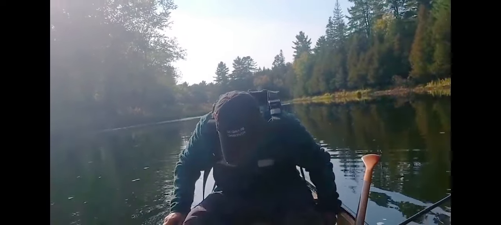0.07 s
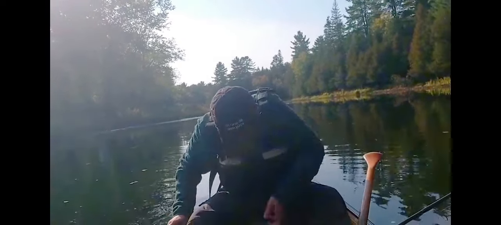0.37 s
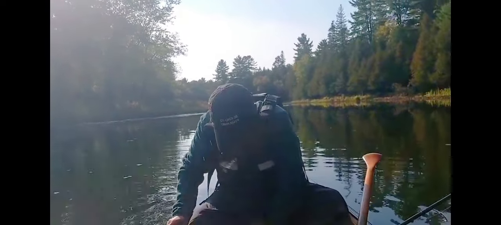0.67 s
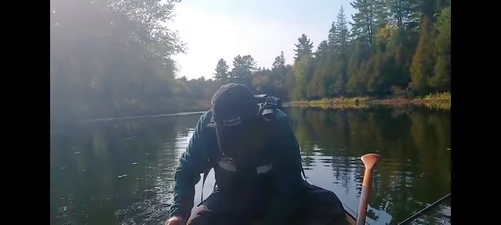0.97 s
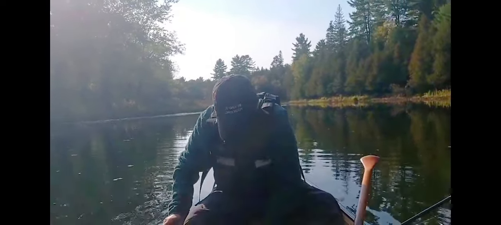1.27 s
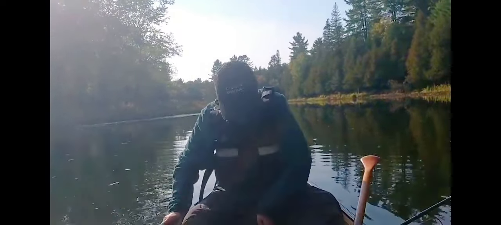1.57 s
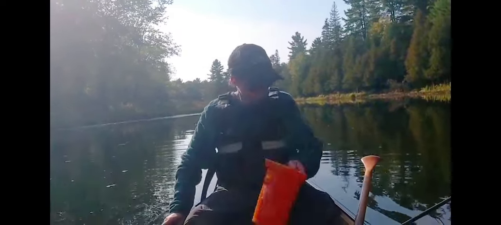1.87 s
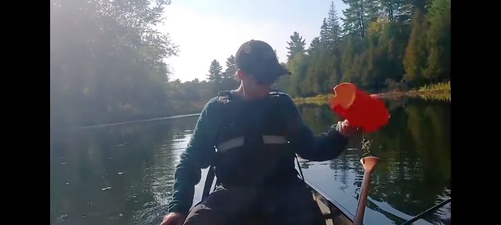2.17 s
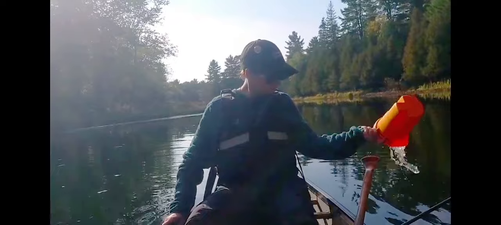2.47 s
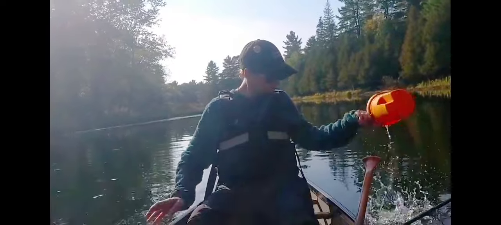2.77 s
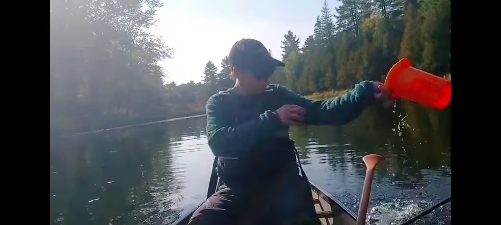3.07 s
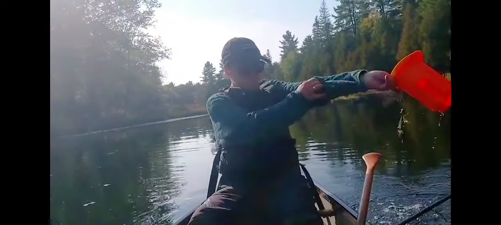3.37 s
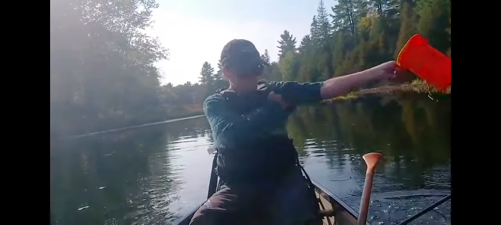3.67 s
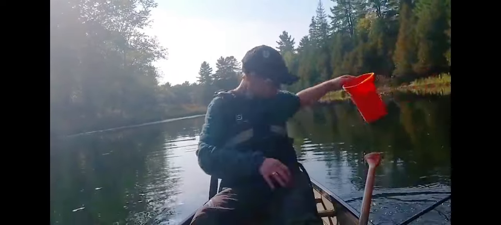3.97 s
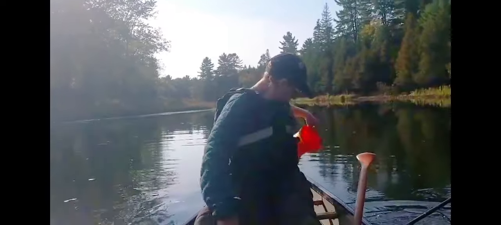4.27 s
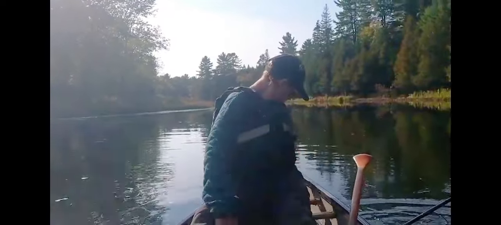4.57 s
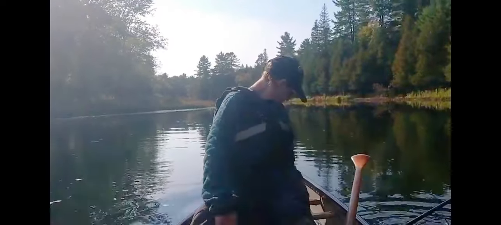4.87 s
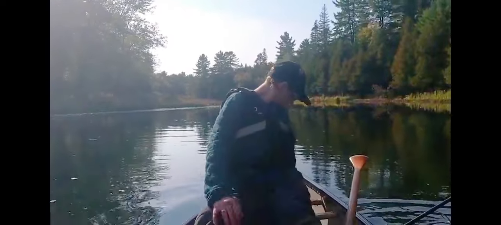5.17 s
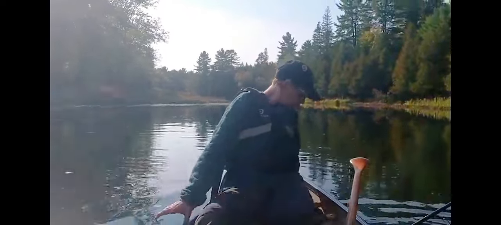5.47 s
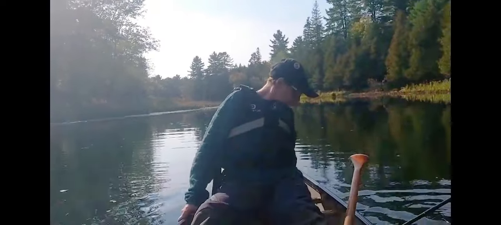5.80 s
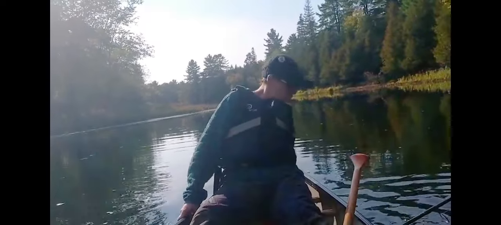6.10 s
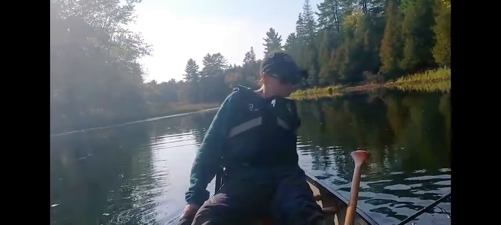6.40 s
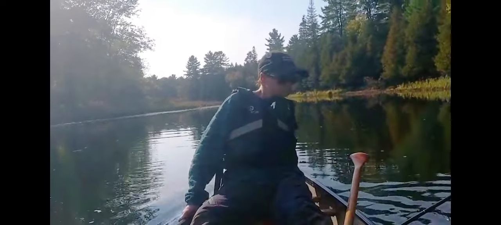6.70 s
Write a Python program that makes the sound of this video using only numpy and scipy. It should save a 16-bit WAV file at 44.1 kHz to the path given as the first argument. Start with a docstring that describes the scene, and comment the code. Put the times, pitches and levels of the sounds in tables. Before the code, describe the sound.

Close by on a calm creek, a plastic jug scrapes along the bottom of a canoe, bumping the hollow hull, and gulps up some water. It is emptied over the side in one short, bright splash that trails off in dribbles. A jacket sleeve rustles and the jug is set down with a click. Then the hull knocks, booms and scrapes again as weight shifts, over a faint outdoor hush.

```python
"""Bailing a canoe

On a calm creek, close by, a plastic jug scrapes along a canoe by stick-slip friction, and each bump
rings the hull's normal modes. The hollow jug rings once, gulps bilge water, is emptied over the side
in one splash and dribbles out: impacts make the spray, and trapped air rings as bubbles. A jacket
sleeve rustles, the jug is put down with a click, and the hull booms under the shifting load."""
import sys
import numpy as np
from scipy import signal
from scipy.fft import rfft, irfft, next_fast_len
from scipy.io import wavfile

SR = 44100
rng = np.random.default_rng(int(sys.argv[2]) if len(sys.argv) > 2 else 0)


def log_audio(samples):
    """Write samples as a 16-bit WAV file to the path given in sys.argv[1]."""
    # one column per channel
    frames = np.atleast_2d(samples).T
    # limit to full scale, then quantise
    limited = np.clip(frames, -1, 1)
    pcm = np.round(limited * 32767).astype(np.int16)
    wavfile.write(sys.argv[1], SR, pcm)


N = 297234
T = np.arange(N) / SR

# Levels in the tables are relative; each source applies its own gain.
# spectrum of the background, low outdoor hush and clothing hiss: frequency_hz, density_db
BACKGROUND_SPECTRUM = [(15, -39), (25, -18), (37, 8.5), (178, -6), (537, -12), (666, -16), (782, -13),
                       (970, -23.5), (3630, -27), (3930, -21), (9300, -21), (12500, -14.5), (15500, -25)]
# jug and boots sliding on the hull: peak_s, rise_s, fall_s, drone_db, rasp_db, hiss_db
SLIDES = [(0.0, .02, .1, -31, -48.5, -54), (0.3, 0.33, 0.9, -52, -61.5, -60.5),
          (0.384, 0.018, 0.069, -43, -52, -56), (0.63, 0.15, 0.33, -43.5, -49.5, -50),
          (0.995, 0.023, 0.16, -18, -34, -42), (1.2, 0.019, .07, -13, -29, -37.5),
          (1.33, .1, 0.1, -20, -48, -59), (1.40, 0.038, 0.063, -28, -40, -52),
          (5.005, 0.1, 0.32, -43.5, -55.5, -56.5), (5.19, 0.018, .09, -45, -44, -46),
          (5.321, 0.086, 0.075, -35, -33.5, -37), (5.441, 0.064, 0.089, -27.5, -35.5, -33),
          (5.617, 0.11, 0.16, -43, -47, -57.5), (5.995, 0.066, 0.082, -38, -54.5, -41),
          (6.14, .04, .03, -29, -55, -65), (6.26, 0.18, 0.11, -28, -50, -46),
          (6.336, 0.073, 0.15, -13, -39.5, -43), (6.378, 0.023, 0.015, -30, -32, -33.5),
          (6.463, .05, 0.076, -48, -49, -47.5), (6.72, 0.063, .2, -29.5, -44.5, -55)]
# spectra of the scrape's rasp and hiss: frequency_hz, density_db
RASP_SPECTRUM = [(290, -26.5), (500, 0.5), (551, -6.5), (745, -9), (1410, -13), (1710, -18), (1960, -14.5),
                 (2860, -26.5), (3500, -26), (4550, -52.5), (7700, -120)]
HISS_SPECTRUM = [(1470, -25), (2500, -4), (2620, -7.5), (2870, -6), (3470, -3), (3720, -5.5), (7980, -7),
                 (9220, -10), (12600, -5), (15500, -13.5)]
# blows on the hull, each favouring a pitch: start_s, level_db, pitch_hz, hardness_db
KNOCKS = [(0.256, -26, 394, -21), (0.275, -25.5, 135, -38), (0.301, -33.5, 170, -31),
          (0.76, -25.5, 280, -2.5), (0.775, -18.5, 158, -12.5), (0.809, -21.5, 201, -24),
          (0.843, -28.5, 203.7, -8.5), (1.023, -15, 183, -2.5), (1.034, -11, 205, -7.5),
          (1.061, -20, 257, -7), (1.119, -16, 143, -30), (1.219, -8, 330, -6), (1.236, -4.5, 237, -15),
          (1.262, -12, 198, -33), (1.433, -19, 247, -7), (1.448, -13.5, 201, -7.5),
          (1.468, -10.5, 208, -29), (1.484, -12.5, 330, -21), (1.509, -12.5, 268.2, -15),
          (5.168, -14, 280, -15), (5.262, -9, 308, -18.5), (5.283, -8.5, 290, -13.5),
          (5.687, -10, 419, -24.5), (5.77, -19, 127, -16), (5.836, -9.5, 148, -9), (5.87, -10, 176, -10),
          (5.904, -16, 117, -39), (5.943, -28, 120.6, -38), (6.148, -4.5, 305, -16), (6.19, -17.5, 141, -9),
          (6.321, -17.5, 217, -7), (6.374, -13.5, 375, -3), (6.392, -19, 124, -32), (6.433, -21, 123, -29),
          (6.692, -33.5, 170, 2)]
# hull modes, a list per register (boom, body, hollow, knock, clack): frequency_hz, level_db, t60_s
HULL_MODES = [
    [(69.6, -10, 0.42), (103.3, -5, 0.6), (116.7, -7.5, 0.42), (144.3, 0.5, 0.32), (158.1, -5.5, 0.5)],
    [(178, 6.5, 0.29), (204.1, -1, 0.25), (227, 4, .22)],
    [(251.7, -4, 0.22), (276.3, 0, 0.18), (311.6, -6.5, .17)],
    [(343.7, -1, 0.18), (377.4, -1.5, 0.17), (404.8, 1, 0.18), (441, 4, 0.12), (455.4, 4, 0.084),
     (497.3, -7.5, 0.11)],
    [(589.6, 3.5, 0.091), (670, 1, 0.13), (761.5, 5.5, 0.066), (842.4, -1, .11), (905, -2.5, 0.052),
     (1040, -4, 0.081), (1146, -2, 0.066), (1360, -1, 0.033)],
]
# jug and gear clacking: start_s, level_db, centre_hz, t60_s
CLACKS = [(0.756, -31, 1640, 0.034), (1.238, -15.5, 3504, 0.023), (1.421, -31, 1340, 0.058),
          (5.17, -24.5, 1262, 0.04), (5.221, -32, 5940, 0.027), (5.256, -22.5, 2170, 0.043),
          (5.259, -29, 4970, 0.012), (5.307, -18.5, 7900, 0.078), (5.682, -32.5, 11000, 0.017),
          (6.148, -25, 1380, 0.041), (6.376, -15.5, 2600, 0.038), (6.695, -28, 4050, .027)]
# short pitched rings, the hollow jug once and then single bubbles: start_s, level_db, pitch_hz, t60_s
PITCHED_RINGS = [(1.203, -29, 1900, .1), (1.511, -20.5, 1380, 0.051), (1.536, -31, 2180, .025),
                 (1.601, -24, 1390, .028), (1.653, -15, 1370, 0.02), (1.657, -20.5, 1040, 0.024),
                 (1.657, -25.5, 2050, 0.026), (1.692, -37.5, 1360, .07), (1.715, -45, 1770, .07),
                 (1.772, -42, 2980, .08), (1.796, -40.5, 2606, 0.047), (2.165, -52, 2330, 0.051),
                 (2.538, -39, 2180, 0.028), (2.58, -49, 1022, .04), (2.625, -33, 1010, 0.033),
                 (2.839, -13.5, 1970, 0.018), (2.878, -16, 720, 0.034), (2.893, -18, 1000, 0.038),
                 (2.912, -16, 718, 0.038), (3.061, -47, 1560, .045), (3.079, -41, 1095, .045),
                 (3.099, -45, 1435, 0.046)]
# bilge water gulping into the jug: peak_s, froth_db, spray_db
GULPS = [(1.39, -49, -47), (1.421, -33, -43), (1.469, -28, -38), (1.508, -33, -36.5), (1.545, -30.5, -38),
         (1.6, -30.5, -35.5), (1.654, -30.5, -26.5)]
# water falling from the jug: peak_s, rise_s, hold_s, fall_s, spray_db
POURS = [(1.697, .04, 0.063, 0.23, -48.5), (2.591, 0.057, 0.029, 0.09, -45.5),
         (2.721, 0.013, 0.22, 0.1, -22.5), (3.016, .03, 0.018, .2, -48.5), (3.182, 0.11, .1, .3, -42.5)]
# spectra of a splash's cavity, entrained air and spray: frequency_hz, density_db
PLUNGE_SPECTRUM = [(41, -28), (70, -4), (240, -2.5), (396, -5.5), (454, -5), (583, -10), (700, -3),
                   (910, -38.5), (1540, -120)]
FROTH_SPECTRUM = [(290, -37.5), (500, -15), (732, -14.5), (822, -19), (945, 4.5), (1550, 1.5), (3200, -8.5),
                  (4160, -30.5), (7040, -120)]
SPRAY_SPECTRUM = [(1410, -0.5), (2400, -11.5), (2620, -0.5), (2850, -12.5), (3030, -1.5), (3720, 0.5),
                  (5450, -1), (7980, -5.5), (8630, -7.5), (11300, -0.5), (15500, -11)]
# drops slapping on water: start_s, level_db, centre_hz, t60_s
DROPS = [(1.466, -20, 2110, 0.017), (1.596, -31, 7000, .03), (1.653, -26, 4490, 0.044),
         (1.653, -23, 11000, .025), (1.738, -32, 8300, 0.061), (1.770, -31.5, 3240, .044),
         (1.8, -29.5, 4940, 0.021), (1.85, -38, 5800, .02), (1.948, -36.5, 6000, 0.025),
         (2.355, -35, 10970, .02), (2.376, -27, 10900, 0.023), (2.703, -24.5, 9100, .008),
         (2.713, -11, 9200, 0.019), (2.743, -11, 11000, 0.011), (2.752, -2.5, 11800, 0.025),
         (2.777, -8, 4850, 0.012), (2.838, -8, 3480, 0.026), (3.052, -18, 12000, 0.0066),
         (3.052, -24.5, 4470, 0.019), (3.102, -26, 12100, 0.017), (3.141, -28.5, 10000, 0.012),
         (3.335, -30, 10500, .015), (3.361, -34.5, 4440, 0.035), (3.452, -33, 4500, .01),
         (3.719, -33.5, 9800, .033)]
# tugs of the jacket sleeves: peak_s, rise_s, fall_s, rub_db, swish_db
SLEEVE_TUGS = [(1.949, 0.32, 0.29, -73, -71.5), (2.41, 0.15, 0.14, -59, -64),
               (3.68, 0.26, 0.88, -59, -55.5), (3.9, 0.095, 0.22, -55, -50.5),
               (4.01, 0.11, 0.23, -53, -51.5), (4.10, 0.066, 0.023, -55, -46),
               (4.26, 0.27, 0.31, -46.5, -58), (4.35, 0.17, 0.3, -43.5, -59)]
# spectra of the nylon's low rub and high swish: frequency_hz, density_db
RUB_SPECTRUM = [(53, -24.5), (90, -2), (443, 1.5), (493, 6.5), (967, -5), (1200, -1), (1510, -9),
                (1810, -8.5), (3500, -12.5), (4550, -55), (7700, -120)]
SWISH_SPECTRUM = [(1470, -8), (2500, 2.5), (3890, 1.5), (5010, 3), (6950, -3), (8350, 2), (9510, -7),
                  (11500, 3), (14800, -3.5), (15500, -2)]
# spectrum of the click as the jug comes down: frequency_hz, density_db
SNAP_SPECTRUM = [(470, -35), (800, -21), (2050, -6.5), (2440, -12), (4110, -1), (6350, -12), (8030, -10),
                 (9440, -21), (12900, -10), (15500, -23)]


def from_db(db):
    """Amplitude grows tenfold for every 20 dB."""
    return 10 ** (np.asarray(db) / 20)


def unit_rms(x):
    """Normalisation to unit mean power."""
    return x / np.sqrt(np.mean(x ** 2) + 1e-20)


def add(out, start_s, sound):
    """Superposition: a sound joins the mix from start_s on."""
    start = max(round(start_s * SR), 0)
    out[start:start + len(sound)] += sound[:N - start]


def coloured(x, spectrum):
    """Minimum-phase filtering imposes a spectrum causally; the result has rms 1."""
    hz, db = np.transpose(spectrum)
    size = next_fast_len(N + SR // 2, real=True) // 2 * 2
    octave = np.log2(np.maximum(np.arange(size // 2 + 1) * SR / size, 1))
    octaves_outside = np.maximum(np.log2(hz[0]) - octave, 0) + np.maximum(octave - np.log2(hz[-1]), 0)
    gain_db = np.interp(octave, np.log2(hz), db) - 30 * octaves_outside
    cepstrum = irfft(np.log(from_db(gain_db)))
    cepstrum[1:size // 2] *= 2   # fold onto positive time
    cepstrum[size // 2 + 1:] = 0
    return unit_rms(irfft(rfft(x, size) * np.exp(rfft(cepstrum)))[:N])


def ring(x, hz, t60):
    """Damped resonance: a unit impulse excites a decaying sine of height 1."""
    radius, angle = from_db(-60 / (t60 * SR)), 2 * np.pi * hz / SR
    return signal.lfilter([0, np.sin(angle)], [1, -2 * radius * np.cos(angle), radius * radius], x)


def fade(t, t60, attack_s):
    """Exponential damping after a quick rise: 60 dB in t60 seconds."""
    return (1 - np.exp(-t / attack_s)) * np.exp(-np.log(1000) * t / t60)


def clicks(per_s, spread_db):
    """A Poisson process: impulses of uneven size at independent random moments."""
    chance, out = rng.random(N) * SR / per_s, np.zeros(N)
    at = np.flatnonzero(chance < 1)
    out[at] = from_db(spread_db * np.minimum(-np.log(chance[at]), 4)) * (-1) ** at
    return out


def grains(per_s, spread_db, smooth):
    """Shot noise: dry clicks over a share of white noise."""
    return unit_rms(clicks(per_s, spread_db)) + smooth * rng.standard_normal(N)


def crackle(per_s, spread_db, cycles, smooth):
    """Resonant shot noise: each click rings at one of many treble pitches, over white noise."""
    pitches_hz = np.geomspace(2000, 15500, 24)
    hits, pitch_index = clicks(per_s, spread_db), rng.integers(0, len(pitches_hz), N)
    rings = sum(hz * ring(hits * (pitch_index == k) + 1e-18, hz, cycles / hz)
                for k, hz in enumerate(pitches_hz))
    return unit_rms(rings) + smooth * rng.standard_normal(N)


def wobble(per_s):
    """Random modulation: a line through per_s Gaussian values a second."""
    knots = rng.standard_normal(N // 10)
    return np.interp(T * per_s, np.arange(len(knots)), knots)


def swell(peak_s, rise_s, fall_s, db, hold_s=0, sag_db_per_s=0):
    """Exponential growth and decay, 20 dB per rise_s and fall_s, around a sagging hold."""
    out, hold_s = np.zeros(N), max(hold_s, 0)
    span = slice(*np.searchsorted(T, [peak_s - 4 * rise_s, peak_s + hold_s + 4 * fall_s]))
    t = T[span] - peak_s
    decades_down = np.maximum(-t, 0) / rise_s + np.maximum(t - hold_s, 0) / fall_s
    out[span] = from_db(db - sag_db_per_s * np.clip(t, 0, hold_s) - 20 * decades_down)
    return out


def power_sum(gains):
    """Incoherent sounds add in power."""
    return np.sqrt(sum(gain ** 2 for gain in gains))


def strokes(rows):
    """Common modulation: a stroke's layers swell together; one gain curve per level column."""
    return power_sum(np.outer(from_db(levels_db), swell(peak_s, rise_s, fall_s, 0))
                     for peak_s, rise_s, fall_s, *levels_db in rows)


def background(level_db, sleeves_still_s, dip_width_s, dip_db):
    """Noise floor: faint, low outdoor hush and clothing hiss, dropping briefly as the sleeves go still."""
    dip = np.exp(-((T - sleeves_still_s) / dip_width_s) ** 2)
    return from_db(level_db + dip_db * dip) * coloured(rng.standard_normal(N), BACKGROUND_SPECTRUM)


def friction_gains(lag_s=0.0024, rise_s=0.027, shudder_fall_s=0.17, skid_fall_s=0.072):
    """Sliding friction: slides and the skid of each blow set the gains of drone, rasp and hiss."""
    # deep blows shudder more, by 6.5 dB an octave; hard blows rasp and hiss more
    shudder = power_sum(swell(start_s + lag_s, rise_s, shudder_fall_s, db - 6.5 * np.log2(hz / 192))
                        for start_s, db, hz, _ in KNOCKS)
    skid = power_sum(swell(start_s + lag_s, rise_s, skid_fall_s, db + hardness_db)
                     for start_s, db, _, hardness_db in KNOCKS)
    from_blows = np.array([from_db(-14) * shudder, from_db(-13.5) * skid, from_db(-23) * skid])
    return power_sum([strokes(SLIDES), from_blows])


def scraping(drone_db, rasp_db, hiss_db):
    """Stick-slip friction: grit catches and lets go, rasping, hissing and driving the hull's modes."""
    drone, rasp, hiss = friction_gains()
    slips = grains(per_s=830, spread_db=-1.0, smooth=0.63)
    grit = crackle(per_s=3800, spread_db=0.0, cycles=18, smooth=0.7)
    low_modes = sum(HULL_MODES[:-1], [])
    hull = sum(from_db(db) * ring(slips, hz, t60 / 2) * (-1) ** k
               for k, (hz, db, t60) in enumerate(low_modes))
    return (from_db(drone_db) * drone * unit_rms(hull)
            + from_db(rasp_db) * rasp * coloured(slips, RASP_SPECTRUM)
            + from_db(hiss_db) * hiss * coloured(grit + 0.5 * slips, HISS_SPECTRUM))


def hull_knocks(register_db, scatter_db, detune, contact_s):
    """Modal excitation: the spot a blow strikes decides how its energy is shared among the modes."""
    out = np.zeros(N)
    for register, modes in enumerate(HULL_MODES):
        hz, db, t60 = np.transpose(modes)[:, :, None]
        t = T[:int(t60.max() * SR)]
        decays = from_db(db) * fade(t, t60, contact_s)
        for start_s, level_db, pitch_hz, hardness_db in KNOCKS:
            octaves = np.log2(hz.mean() / pitch_hz)
            rolloff_db = min(17.5 * octaves, -6 * octaves)   # steeper below the favoured pitch
            share_db = hardness_db if modes is HULL_MODES[-1] else rolloff_db
            strength, shift, polarity = rng.standard_normal((3, len(modes), 1))
            # the water and the load on the skin move each mode a little
            swings = np.sin(2 * np.pi * hz * (1 + detune * shift) * t)
            tone = np.sum(np.sign(polarity) * from_db(scatter_db * strength) * decays * swings, axis=0)
            gain = from_db(level_db + share_db + register_db[register])
            add(out, start_s, gain * tone / np.std(tone[:SR // 30]))
    return out


def impacts(rows, level_db, relative_width, attack_s):
    """Impact noise: a clack of gear or slap of a drop is a short burst in one broad resonance."""
    out, t = np.zeros(N), T[:SR // 10]
    for start_s, db, hz, t60 in rows:
        radius = np.exp(-np.pi * relative_width * hz / SR)
        resonance = [1, 0, -1, 1, -2 * radius * np.cos(2 * np.pi * hz / SR), radius * radius]
        burst = rng.standard_normal(len(t)) * fade(t, t60, attack_s)
        crack = signal.sosfilt([resonance, resonance], burst)
        add(out, start_s, from_db(db + level_db) * crack / np.abs(crack).max())
    return out


def hull_echo(x, wet_db, t60, bounces_per_s=2500):
    """Early reflections: sound bounces briefly between the canoe's sides and the water."""
    t = T[:SR // 6]
    bounces = rng.standard_normal(len(t)) * (rng.random(len(t)) < bounces_per_s / SR)
    bounces *= fade(t, t60, attack_s=0.003)
    return x + from_db(wet_db) * signal.fftconvolve(x, bounces / np.linalg.norm(bounces))[:N]


def rising_ring(hz, t60, glide, swell_cycles):
    """Damped oscillation that swells and climbs in pitch, as a bubble's does near the surface."""
    t = T[:int(t60 * SR) + 2]
    return fade(t, t60, swell_cycles / hz) * np.sin(2 * np.pi * hz * t * (1 + glide * t / t60 / 2))


def jug_and_bubble_rings(level_db, glide, swell_cycles, flutter_db):
    """Resonance: the hollow jug rings once, then single bubbles ring, fluttering in churning water."""
    out = np.zeros(N)
    for start_s, db, hz, t60 in PITCHED_RINGS:
        add(out, start_s, from_db(db + level_db) * rising_ring(hz, t60, glide, swell_cycles))
    return out * from_db(flutter_db * wobble(per_s=570))


def pour_gains(peak_s, rise_s, hold_s, fall_s, spray_db):
    """Jet impact: spray comes first, then air is dragged under as froth, and a cavity opens last."""
    # lag_s, extra_rise_s, level_db
    plunge = (0.1, 0.061, 1.413 * spray_db)   # grows faster than the spray
    froth = (0.03, 0.012, spray_db - 3.5)
    spray = (0, 0, spray_db)
    return np.array([swell(peak_s + lag_s, rise_s + extra_s, fall_s, db, hold_s - lag_s, sag_db_per_s=49)
                     for lag_s, extra_s, db in (plunge, froth, spray)])


def flow_gains(gulp_rise_s=0.017, gulp_fall_s=0.034):
    """Power addition: all gulps and pours combine into the gains of plunge, froth and spray."""
    gulps = strokes((peak_s, gulp_rise_s, gulp_fall_s, froth_db - 8.5, froth_db, spray_db)
                    for peak_s, froth_db, spray_db in GULPS)
    return power_sum([gulps] + [pour_gains(*row) for row in POURS])


def bubble_cloud(per_s, low_hz, high_hz, cycles, spread_db):
    """Air entrainment: small bubbles form at random while water moves; rms 1 over that time."""
    out = np.zeros(N)
    start_s, end_s = GULPS[0][0], sum(POURS[-1][:-1])
    count = int(per_s * (end_s - start_s))
    for when, pitch, strength in rng.random((4000, 3))[:count]:
        hz = low_hz * (high_hz / low_hz) ** pitch
        bubble = rising_ring(hz, cycles / hz, glide=0.14, swell_cycles=0.94)
        add(out, start_s + when * (end_s - start_s), from_db(spread_db * strength) * bubble)
    return out / np.std(out[int(start_s * SR):int(end_s * SR)])


def splash(plunge_db, froth_db, cloud_db, spray_db, spatter_db):
    """Impact and entrainment: water lands as spray and a few fat drops, drags air under and gurgles."""
    plunge, froth, spray = flow_gains()
    cavity = grains(per_s=300, spread_db=-4.0, smooth=0.17)
    slaps = grains(per_s=1200, spread_db=2.5, smooth=0.29)
    cloud = bubble_cloud(per_s=600, low_hz=691, high_hz=2790, cycles=26, spread_db=16)
    droplets = crackle(per_s=3500, spread_db=4.0, cycles=55, smooth=0.6)
    spatter = from_db(spatter_db) * crackle(per_s=130, spread_db=5.0, cycles=10, smooth=0)
    return (plunge * from_db(plunge_db) * coloured(cavity, PLUNGE_SPECTRUM)
            + froth * (from_db(froth_db) * coloured(slaps, FROTH_SPECTRUM) + from_db(cloud_db) * cloud)
            + spray * from_db(spray_db) * coloured(droplets + 0.5 * slaps + spatter, SPRAY_SPECTRUM))


def jacket(rub_db, swish_db):
    """Fabric friction: nylon slides over nylon in uneven tugs as the arms swing."""
    rub, swish = strokes(SLEEVE_TUGS)
    threads = grains(per_s=7100, spread_db=5.0, smooth=0.86) * from_db(1.5 * wobble(per_s=35))
    return (from_db(rub_db) * rub * coloured(threads, RUB_SPECTRUM)
            + from_db(swish_db) * swish * coloured(threads, SWISH_SPECTRUM))


def jug_snap(start_s, level_db, t60, attack_s):
    """A brief contact has a broad spectrum: the jug comes down with one hard, bright click."""
    envelope = fade(np.maximum(T - start_s, 0), t60, attack_s)
    return from_db(level_db) * coloured(rng.standard_normal(N), SNAP_SPECTRUM) * envelope


def scene():
    """Superposition: boat, water, paddler and background sum at one point on board."""
    knocks = hull_knocks(register_db=[-2.0, -3.5, -6.0, -8.5, -9.5], scatter_db=6.0,
                         detune=0.01, contact_s=0.0037)
    scrapes = scraping(drone_db=-2.5, rasp_db=1.0, hiss_db=-0.5)
    water = splash(plunge_db=3.5, froth_db=-5.0, cloud_db=-11.0, spray_db=-1.3, spatter_db=-13)
    rings = jug_and_bubble_rings(level_db=2.0, glide=0.11, swell_cycles=2.4, flutter_db=4.5)
    drops = impacts(DROPS, level_db=-4.5, relative_width=0.81, attack_s=0.001)
    clacks = impacts(CLACKS, level_db=-5.0, relative_width=1.0, attack_s=0.0013)
    snap = jug_snap(start_s=4.46, level_db=-18, t60=0.025, attack_s=0.0021)
    rings = hull_echo(rings, wet_db=-3.5, t60=0.025)
    taps = hull_echo(drops + clacks + snap, wet_db=-10.0, t60=0.072)
    floor = background(level_db=-58.5, sleeves_still_s=4.8, dip_width_s=0.11, dip_db=-7.5)
    rustle = jacket(rub_db=-1.0, swish_db=1.5)
    return (knocks + scrapes + water + rings + taps + rustle + floor)[None]


def record(dry):
    """Band limiting and soft saturation: deep bass is thinned, peaks are rounded, the top is cut."""
    highpass = signal.butter(3, 62, "high", fs=SR, output="sos")
    lowpass = signal.ellip(12, 0.1, 90, 15800, fs=SR, output="sos")
    thinned = signal.sosfilt(highpass, dry)
    rounded = 1.2 * np.tanh(thinned / 1.2)
    return signal.sosfilt(lowpass, rounded)


dry = scene()
out = record(dry)
log_audio(out)
```